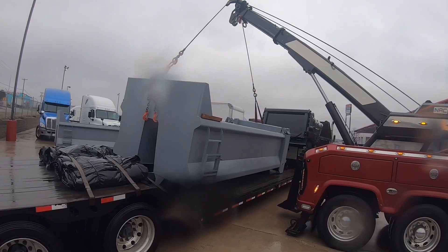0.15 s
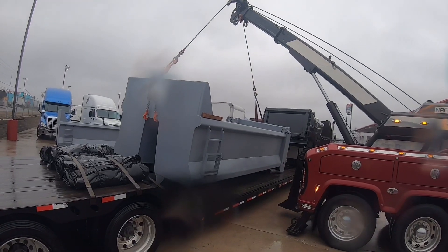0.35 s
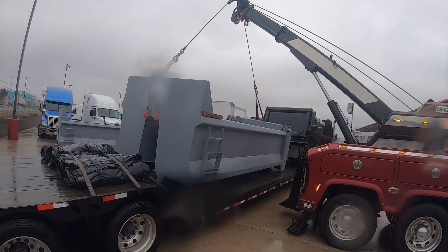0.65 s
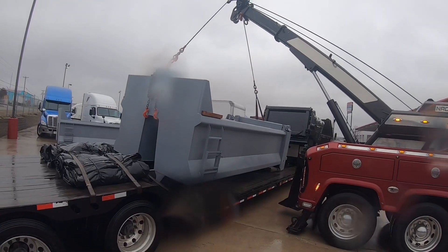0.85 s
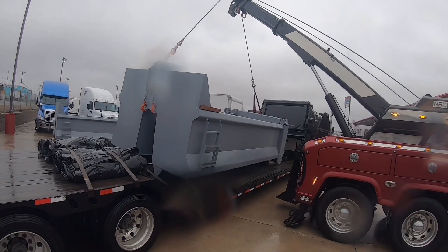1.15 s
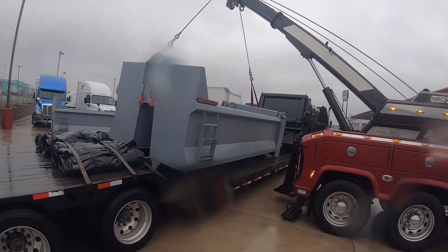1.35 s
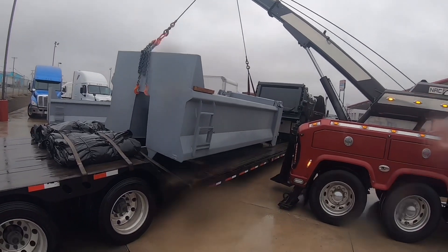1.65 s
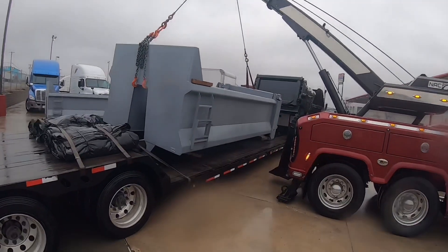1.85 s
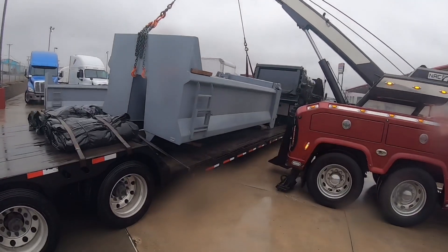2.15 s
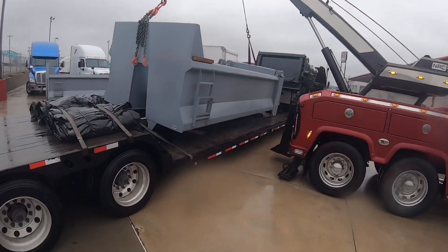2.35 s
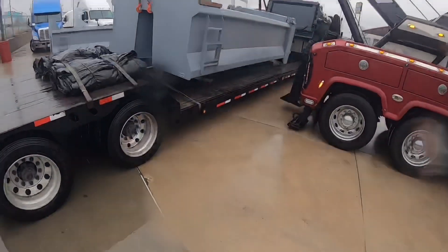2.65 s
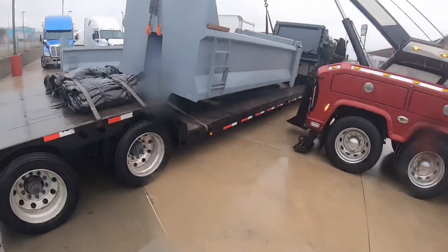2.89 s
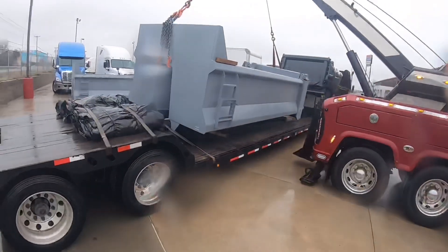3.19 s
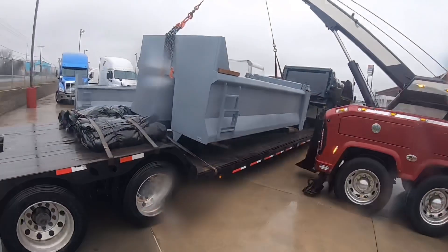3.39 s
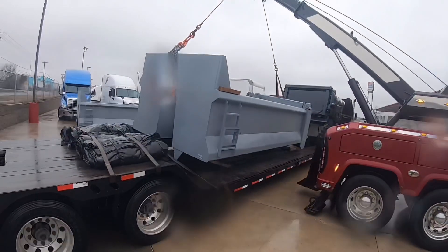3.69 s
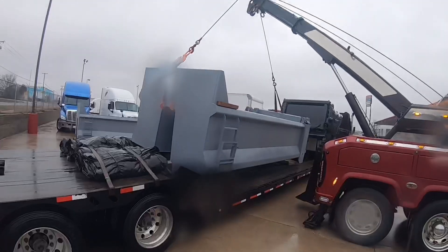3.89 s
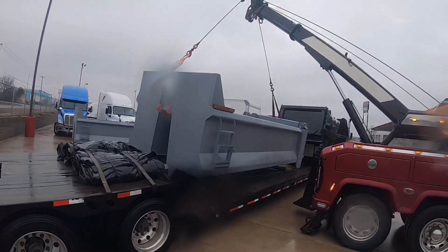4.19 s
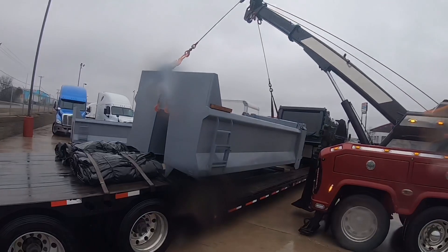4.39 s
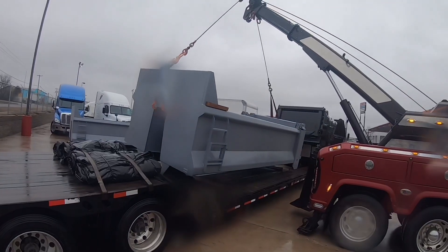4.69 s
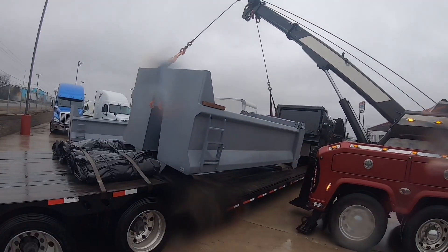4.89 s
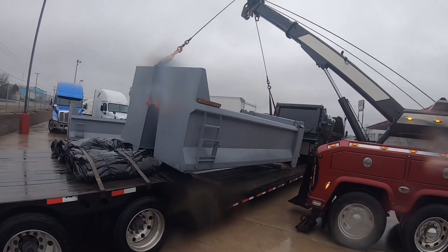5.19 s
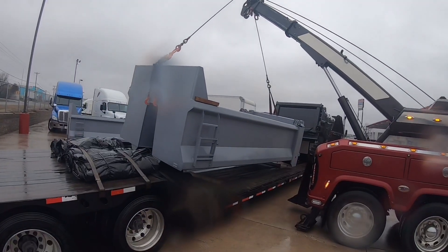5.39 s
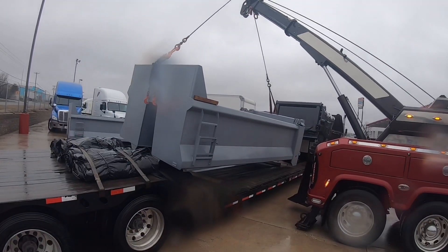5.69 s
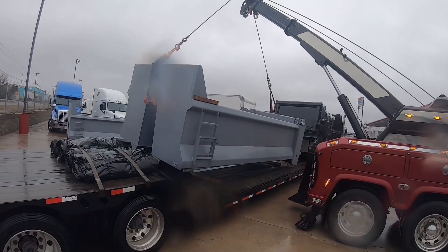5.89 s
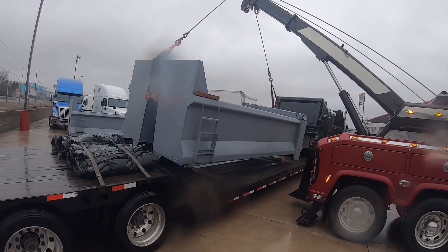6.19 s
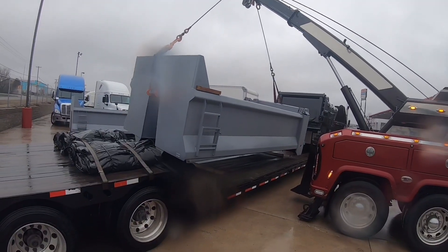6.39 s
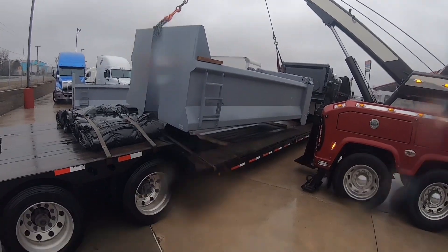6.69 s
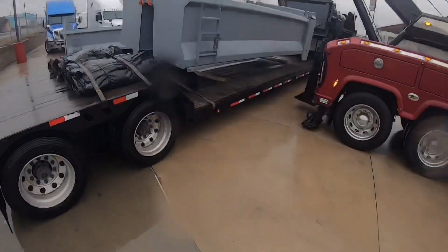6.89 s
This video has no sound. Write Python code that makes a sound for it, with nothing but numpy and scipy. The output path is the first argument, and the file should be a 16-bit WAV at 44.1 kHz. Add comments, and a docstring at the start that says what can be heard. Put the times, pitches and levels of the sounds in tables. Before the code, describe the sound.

Continuous heavy wrecker engine noise fills the stretch: low pulsing exhaust, a dense hum around the low mids, rattling block and panels, and slight intake hiss. Low yard rumble and a second idling truck lie underneath. Close on the microphone, small rain taps and low, short handling bumps come and go, the strongest near the start of the second second and near the end. The sound is outdoor, dry and slightly dull on top.

```python
"""A heavy wrecker's six-cylinder diesel throbs and drones at low speed on a wet lot, with another truck idling nearby.
The exhaust is a few tones at multiples of the firing rate; the drone and clatter are noise that partly
repeats with each engine cycle, coloured by the block and panels; a thin turbo whistle rises and falls.
The microphone is in a hand-held camera: dull bumps swing its mount, light knocks buzz its case and raindrops tick on it."""
import sys
import numpy as np
from scipy import signal
from scipy.fft import rfft, irfft, next_fast_len
from scipy.io import wavfile
from scipy.ndimage import map_coordinates

SR = 44100
rng = np.random.default_rng(int(sys.argv[2]) if len(sys.argv) > 2 else 0)


def output_pcm(signal):
    """Save a mono or channel-first signal as 16-bit PCM at the path in sys.argv[1].

    Samples are clipped to [-1, 1] before scaling.
    """
    pcm = np.clip(np.atleast_2d(signal).T, -1, 1) * 32767
    wavfile.write(sys.argv[1], SR, np.round(pcm).astype(np.int16))


N = 310905  # length in samples


def amp(db):
    """Decibels to gain."""
    return 10 ** (np.asarray(db) / 20)


def unit(x):
    """x scaled to rms 1."""
    return x / np.sqrt(np.mean(x ** 2) + 1e-20)


def curves(rows):
    """One value per sample for each column after the time."""
    time_s, *columns = np.transpose(rows)
    return [np.interp(np.arange(N) / SR, time_s, column) for column in columns]


def wobble(rate):
    """A smooth random curve with the given number of knots a second."""
    knots = rng.standard_normal(int(N * rate / SR) + 4)
    return map_coordinates(knots, [np.arange(N) * rate / SR])


def filtered(x, response):
    """x with its spectrum multiplied by a response of frequency."""
    size = next_fast_len(len(x) + 8192)  # padding keeps the filter's tail from wrapping round
    spectrum = rfft(x, size) * response(np.fft.rfftfreq(size, 1 / SR))
    return irfft(spectrum, size)[:len(x)]


def coloured(x, spectrum):
    """x shaped by (Hz, dB) points joined on a log frequency axis, at rms 1."""
    point_hz, point_db = np.transpose(spectrum)
    return unit(filtered(x, lambda hz: amp(np.interp(np.log(hz + 1), np.log(point_hz), point_db))))


def resonating(x, modes):
    """x through parallel (Hz, width, dB) resonances, each a squared second-order peak, at rms 1."""
    def response(f):
        total = 0
        for centre, width, db in modes:
            peak = 1j * f * width / (centre * centre - f * f + 1j * f * width)
            total = total + amp(db) * peak ** 2
        return total
    return unit(filtered(x, response))


def noise():
    """Fresh white noise."""
    return rng.standard_normal(N)


def add(track, start_s, sound):
    """Mix a sound into the track at its start time."""
    part = track[round(start_s * SR):][:len(sound)]
    part += sound[:len(part)]


def repeating(firings, share, count=6, size=4096):
    """Noise of which a share of the power repeats with every cycle of the six cylinders."""
    pattern = unit(irfft(np.exp(2j * np.pi * rng.random(size // 2 + 1))))
    cycle = np.interp(firings / count, np.arange(size) / size, pattern, period=1)
    share = np.clip(share, 0, 1)
    return np.sqrt(share) * cycle + np.sqrt(1 - share) * noise()


def firing_gate(firings, depth, decay, uneven_db, count=6):
    """A decaying burst at every firing; each cylinder keeps its own strength, each firing varies a little."""
    index = firings.astype(int)
    cylinder_db = uneven_db * unit(rng.standard_normal(count))
    firing_db = 1.9 * rng.standard_normal(index[-1] + 1)
    strength = amp(cylinder_db[index % count] + firing_db[index])
    bursts = unit(strength * np.exp(-(firings % 1) / decay))  # decay is in firing intervals
    share = np.clip(depth, 0, 1)
    return np.sqrt(1 - share + share * bursts ** 2)


# low hum tones over the lot, the other truck's at 40, 80 and 160 Hz, plus a lone tone near 49 Hz: pitch_hz,
# level_db (rms, about which it wanders)
LOW_HUMS = [(40.3, -62), (49, -63), (80.6, -63.5), (160.5, -65.5)]
# colour of the yard's low rumble: frequency_hz, density_db (relative, per Hz)
YARD_RUMBLE = [(10, -15.5), (25, 0.5), (40, 0), (60, 2.5), (100, -4.5), (140, -6), (190, -9), (260, -8.5),
               (500, -39.5), (1000, -72)]


def lot():
    """Another truck hums in wandering low tones, beside a lone tone near 49 Hz, over the yard's rumble, which
    is shaped noise."""
    t = np.arange(N) / SR
    hum = 0
    for hz, db in LOW_HUMS:
        level = amp(db + 2.8 * wobble(0.71))
        hum = hum + level * unit(np.sin(2 * np.pi * hz * t + 1.6 * wobble(2.365)))
    rumble_level = amp(-51.5 + 0.92 * wobble(3.8))
    return hum + rumble_level * coloured(noise(), YARD_RUMBLE)


# raindrops on the camera case: start_s, level_db (peak of the lower band, before the case's treble loss), band_hz
RAINDROPS = [(.105, -43, 2930), (1.5638, -52, 6200), (1.7053, -36, 3860), (1.7395, -25, 1700),
             (1.9833, -40, 2480), (2.783, -32, 1670), (2.784, -46.5, 4170), (3.058, -42.5, 2970),
             (4.192, -35.5, 1800), (4.2957, -39, 3200), (5.148, -34, 1850), (5.311, -32, 2607),
             (5.678, -45, 4400), (5.767, -33, 2560), (5.841, -53, 6500), (6.214, -33, 2510),
             (6.629, -27.5, 1520), (6.647, -43.5, 3150)]
DROP_OCTAVES = 0.62  # width of a drop's band
SPLASH_T60_S, SPLASH_SHARE = 0.017, 0.087  # splash after the tap: 60 dB decay time, size beside the tap
UPPER_RATIO, UPPER_DB = 1.7, -24.5  # second band: pitch ratio and level relative to the first


def drops():
    """Each drop is a sharp tap and a short noisy splash, ringing two bands set by the spot where it lands."""
    track, t = np.zeros(N), np.arange(SR // 10) / SR
    for start_s, db, hz in RAINDROPS:
        splash = rng.standard_normal(len(t)) * amp(-60 * t / SPLASH_T60_S)
        tap = (t == 0) + SPLASH_SHARE * splash
        soft = np.cumsum(tap)  # water lands softly: the push falls 6 dB an octave
        for centre, band_db in (hz, db), (hz * UPPER_RATIO, db + UPPER_DB):
            edges = np.clip(centre * 2 ** (DROP_OCTAVES * np.array([-.5, .5])), 100, 16000)
            band = signal.butter(2, edges, "bandpass", fs=SR, output="sos")
            tick = signal.sosfilt(band, soft)
            add(track, start_s, amp(band_db) * tick / np.abs(tick).max())
    return filtered(track, lambda f: 1 / (1 + (f / 8600) ** 16))  # the case passes little of the highest treble


# knocks that buzz the camera case, alone or with a bump: start_s, level_db (peak), pitch_hz
CASE_KNOCKS = [(1.938, -45, 738.7), (2.379, -39, 585), (5.526, -44, 710), (6.604, -34.5, 580),
               (6.629, -31.5, 583)]
KNOCK_WIDTH_HZ, KNOCK_T60_S = 126, 0.07  # resonance width; 60 dB decay time of the noise driving it


def case_knocks():
    """A light knock sets the case buzzing: a decaying noise burst through one narrow resonance."""
    track, t = np.zeros(N), np.arange(SR // 5) / SR
    for start_s, db, hz in CASE_KNOCKS:
        burst = rng.standard_normal(len(t)) * amp(-60 * t / KNOCK_T60_S)
        buzz = resonating(burst, [(hz, KNOCK_WIDTH_HZ, 0)])
        add(track, start_s, amp(db) * buzz / np.abs(buzz).max())
    return track


# bumps on the hand-held camera: start_s, level_db (nominal peak of the swing), pitch_hz
CAMERA_BUMPS = [(1.537, -13.5, 104.2), (1.941, -30.5, 84), (2.383, -18.5, 110), (2.416, -37, 100.3),
                (3.961, -38, 90.06), (4.2232, -26.5, 101), (6.61, -11, 111.8), (6.628, -21, 91),
                (6.657, -24.5, 72), (6.692, -22.5, 80), (6.706, -23, 75.5), (6.895, -27, 106),
                (6.973, -25.5, 101)]
# resonances of the rattling case: pitch_hz, width_hz, level_db (relative)
CASE_RATTLE = [(154, 62, 1), (202, 69, 7), (292, 55, 3), (552, 52, 1), (743, 140, -11), (1334, 650, -22.5)]
SWELL_CYCLES = 0.63  # swings of the mount up to its widest
RATTLE_DB, HARD_DB, HARD_HZ = -14, -17, 110  # rattle relative to the swing, for a hard bump of this peak and pitch
RATTLE_GROWS, RATTLE_DB_PER_HZ = 0.87, 0.62  # weaker and lower bumps rattle less: dB per dB, dB per Hz
AFTER_RING_DB, AFTER_RING_HZ, AFTER_RING_T60_S = -21, 169.2, .22  # relative to the swing


def bumps():
    """Each bump rattles the case with noise, then swings the mount for a few cycles and leaves it ringing faintly."""
    track, t = np.zeros(N), np.arange(SR // 5) / SR
    late = np.maximum(t - .003, 0)  # the mount gives way just after the contact
    ring_decay = amp(AFTER_RING_DB - 60 * late / AFTER_RING_T60_S)
    after_ring = ring_decay * np.sin(2 * np.pi * AFTER_RING_HZ * late)
    for start_s, db, hz in CAMERA_BUMPS:
        rise = late * hz / SWELL_CYCLES
        swing = (rise * np.exp(1 - rise)) ** 1.02 * np.sin(2 * np.pi * hz * late)
        rattle_db = RATTLE_DB + RATTLE_GROWS * (db - HARD_DB) + RATTLE_DB_PER_HZ * (hz - HARD_HZ)
        envelope = amp(-60 * t / 0.077) * (1 - np.exp(-t / 0.001))
        rattle = resonating(rng.standard_normal(len(t)), CASE_RATTLE) * envelope
        add(track, start_s, amp(db) * (swing + after_ring + amp(rattle_db) * rattle))
    return track


# the turbocharger's whistle, before its flutter: time_s, pitch_hz
TURBO_PITCH = [(0, 5430), (2.0, 5350), (3.4, 5400), (4.18, 5440), (4.3, 5620), (4.43, 6250), (4.56, 6380),
               (4.83, 6300), (5.13, 6340), (5.39, 5980), (5.72, 5693), (6.15, 5420), (7.05, 5500)]
# intake duct resonances that lift the whistle as it sweeps past: pitch_hz, width_hz, gain_db
INTAKE_DUCT = [(5607, 58, 15.5), (5930, 110, 9.5), (6300, 140, 11)]
# swells of the whistle: time_s (middle), length_s, gain_db
WHISTLE_SWELLS = [(2.596, 0.19, 13), (4.26, 0.26, 8.5), (5.665, 0.83, 15), (7.05, 0.27, 10)]
WHISTLE_DB = -90.5  # rms, before duct, swells and flutter


def tone(pitch_hz):
    """A sine that follows a pitch curve, at rms 1."""
    return unit(np.sin(2 * np.pi * np.cumsum(pitch_hz) / SR))


def turbo():
    """A thin, fluttering whistle climbs and sinks back through the duct's resonances, beside a fainter steady one."""
    hz, = curves(TURBO_PITCH)
    t = np.arange(N) / SR
    duct_db = sum(db / (1 + (2 * (hz - centre) / width) ** 2) for centre, width, db in INTAKE_DUCT)
    swell_db = sum(db * np.exp(-(2 * (t - s) / length) ** 2) for s, length, db in WHISTLE_SWELLS)
    gliding_level = amp(WHISTLE_DB + duct_db + swell_db + 3 * wobble(35))
    gliding = gliding_level * tone(hz * (1 + 0.0039 * wobble(200)))
    steady = amp(-95.5 + 2.4 * wobble(0.98)) * tone(5612 + 9 * wobble(60))
    return gliding + steady


# exhaust throb: time_s, level_db (before a small fixed trim)
THROB_LEVEL = [(0, -44), (.35, -38.5), (.7, -44.5), (1.42, -39.5), (1.75, -57), (2.8, -60.5), (3.15, -42),
               (3.65, -51.5), (3.9, -41.5), (4.3, -61.5), (5.0, -41), (5.8, -42), (6.1, -50.5), (6.45, -42),
               (7.05, -53)]
# exhaust tones: multiple (of the firing rate), level_db (relative)
EXHAUST_TONES = [(1, 2.5), (2, -6), (3, -15), (4, -22)]


def exhaust(firings):
    """The firing rate and its first overtones throb from the stack as sines locked to the crank."""
    level_db, = curves(THROB_LEVEL)
    tones = 0
    for multiple, db in EXHAUST_TONES:
        phase = 2 * np.pi * (multiple * firings + rng.random())
        tones = tones + amp(db + 1.2 * wobble(7.3)) * np.sin(phase)
    return amp(level_db - 0.8) * unit(tones)


# the engine bay as a whole: time_s, level_db (reference for the drone and clatter)
BAY_LEVEL = [(0, -49.5), (2.4, -49.5), (3.7, -48), (5.3, -48.9), (6.55, -48.5), (7.05, -50.5)]
# colour of the engine's drone: frequency_hz, density_db (relative, per Hz)
DRONE_COLOUR = [(120, -47.5), (240, -23), (295, -7), (335, -6), (350, -0.5), (400, 0), (432, 2.5),
                (456, -3), (480, -14), (500, -29.5), (700, -47), (1500, -86.5)]
# broad sound of the block: frequency_hz, density_db (relative, per Hz)
BLOCK_COLOUR = [(200, -30.5), (500, -10), (660, -10.5), (810, -12.5), (1020, -13.5), (1250, -5), (1520, -6),
                (1680, 1.5), (1900, 0.5), (2100, -9), (2500, -15.5), (3300, -13), (3900, -27.5),
                (6000, -72.5)]
# ringing panels and covers: pitch_hz, width_hz, level_db (relative)
PANEL_MODES = [(532, 46, -0.5), (604, 21, -8), (751.4, 22.6, -1), (879, 22, -6), (1212, 45, -4.5),
               (1464, 41, -2), (1652, 22.7, 3.5), (2209, 92, -5)]
# colour of the intake hiss: frequency_hz, density_db (relative, per Hz)
HISS_COLOUR = [(1500, -15), (3500, 3), (4300, 6), (4900, -1), (5300, -2), (5600, 5.5), (5950, 4.5),
               (6500, -3.5), (7500, -6), (8500, -10.5), (9900, -10.5), (11000, -35), (13300, -16.5)]
DRONE_DB = 5.5  # the drone relative to the bay level


def engine_bay(firings):
    """Crowded crank orders drone; combustion knocks rattle the block and ring its panels; the intake hisses."""
    level_db, = curves(BAY_LEVEL)
    drone = coloured(repeating(firings, share=0.42), DRONE_COLOUR)
    drone = drone * amp(0.33 * wobble(18) + 0.18 * wobble(1.7))
    knocks = firing_gate(firings, depth=0.12, decay=0.67, uneven_db=3.5)
    block = coloured(repeating(firings, share=0.15) * knocks, BLOCK_COLOUR)
    panels = resonating(repeating(firings, share=0.38) * knocks, PANEL_MODES)
    hiss = amp(-26.5 + 0.73 * wobble(14)) * coloured(noise(), HISS_COLOUR)
    clatter = amp(-0.76) * block + amp(-6.5) * panels + hiss
    return amp(level_db) * (amp(DRONE_DB) * drone + amp(0.33 * wobble(10.0)) * clatter)


# the diesel's beat, before a slight wander: time_s, firing_hz
FIRING_RATE = [(0, 36.5), (.6, 35.53), (1.1, 36.21), (1.55, 35.35), (2.2, 35.73), (2.8, 36.22),
               (3.5, 35.29), (4.2, 36.08), (4.8, 36.17), (5.35, 35.38), (6, 35.44), (7.05, 35.94)]


def scene():
    """One crankshaft drives exhaust and engine bay; whistle, lot and the touches on the camera join them."""
    firing_hz, = curves(FIRING_RATE)
    firings = np.cumsum(firing_hz * (1 + .004 * wobble(6))) / SR  # running count of firings
    background = lot() + drops() + case_knocks() + bumps()
    engine = turbo() + exhaust(firings) + engine_bay(firings)
    return (background + engine)[None]


TOP_HZ = 13700  # the camera's band limit


def record(dry):
    """The camera keeps nothing above its band limit."""
    return filtered(dry[0], lambda hz: hz < TOP_HZ)[None]


dry = scene()
out = record(dry)
output_pcm(out)
```